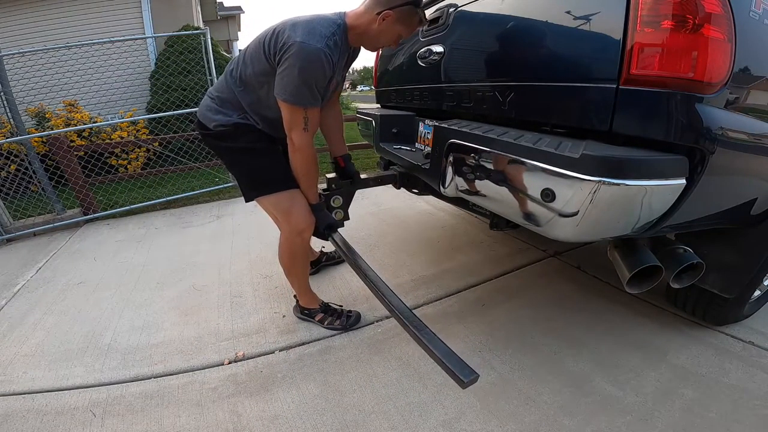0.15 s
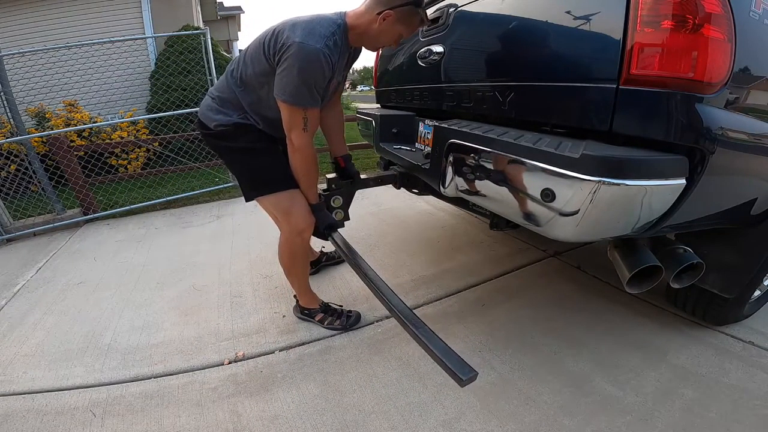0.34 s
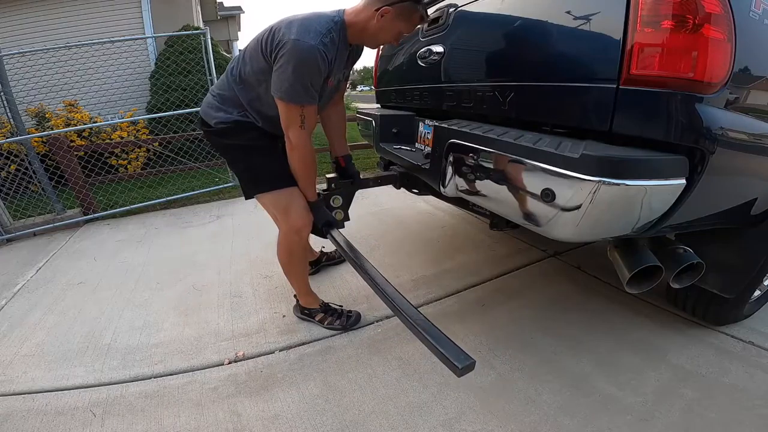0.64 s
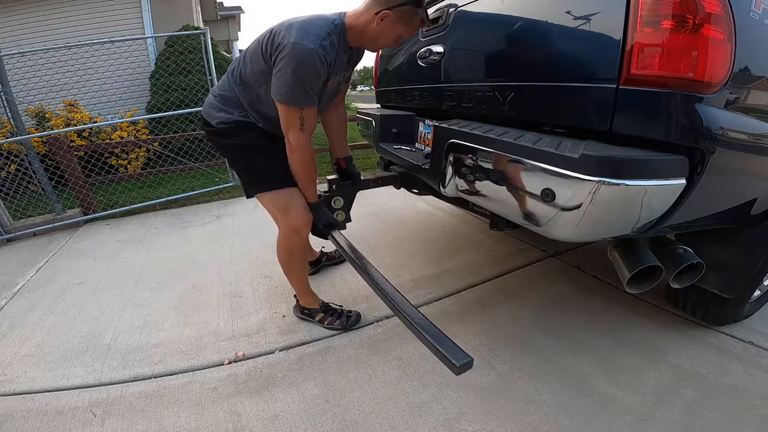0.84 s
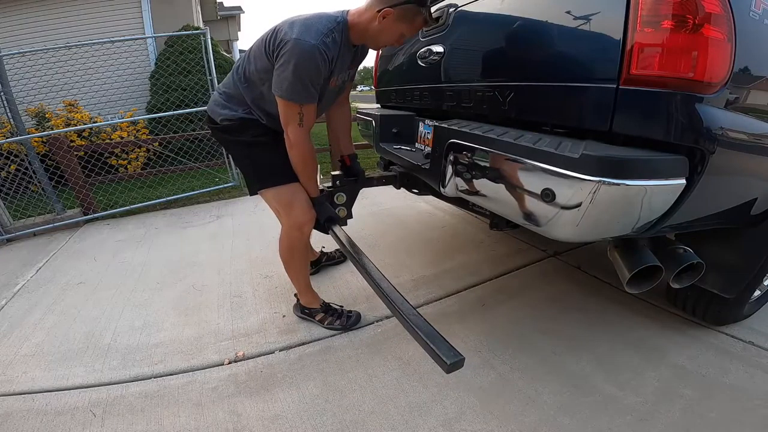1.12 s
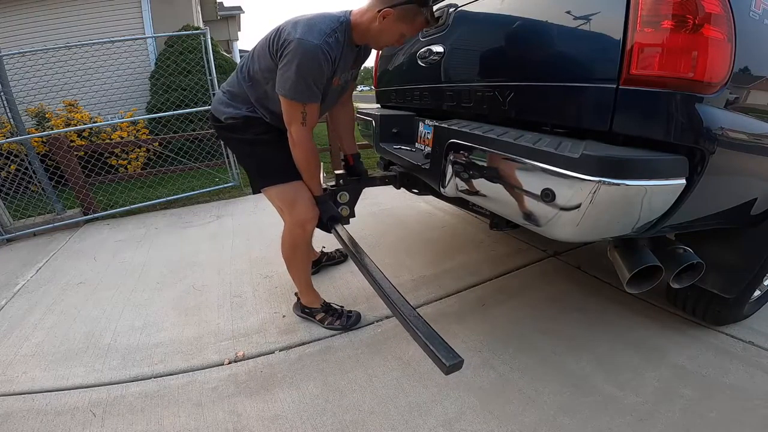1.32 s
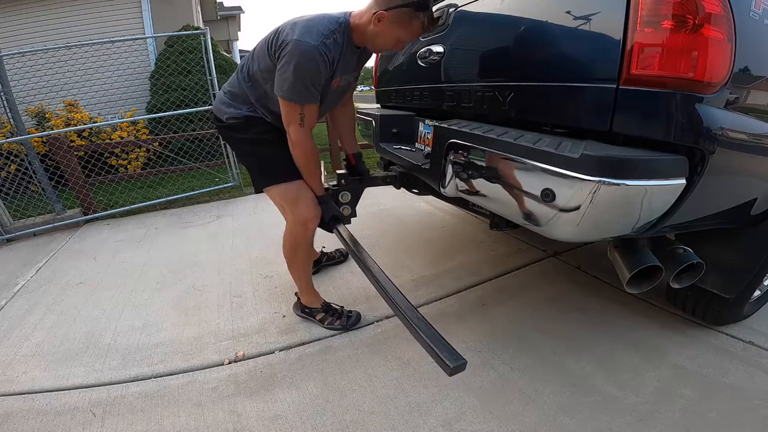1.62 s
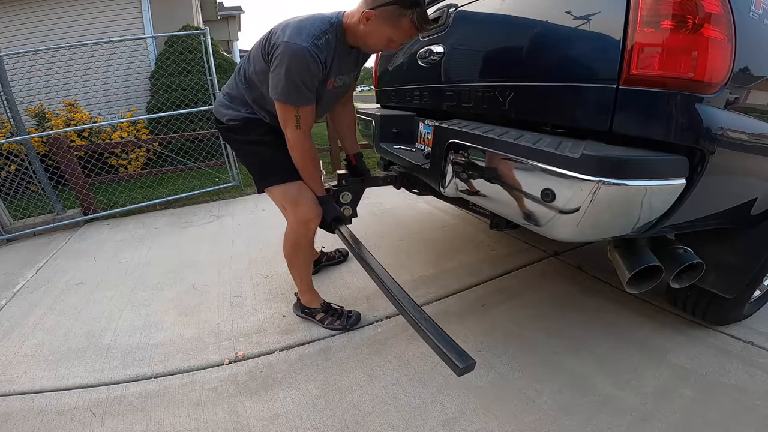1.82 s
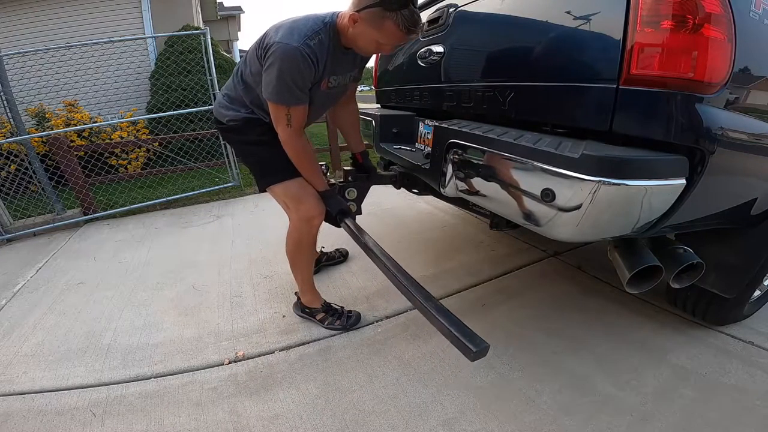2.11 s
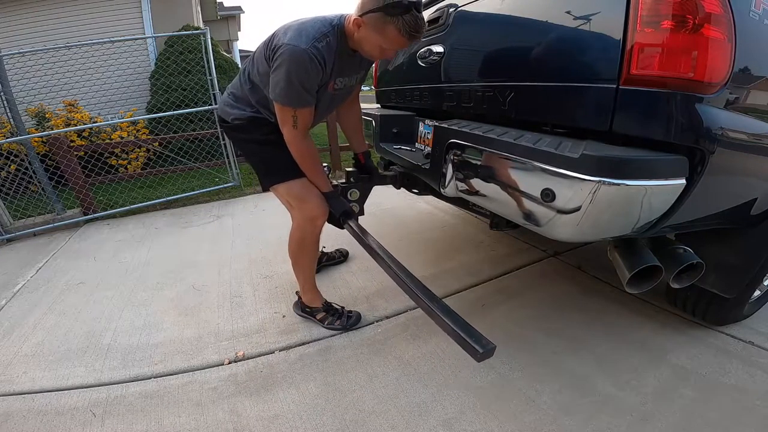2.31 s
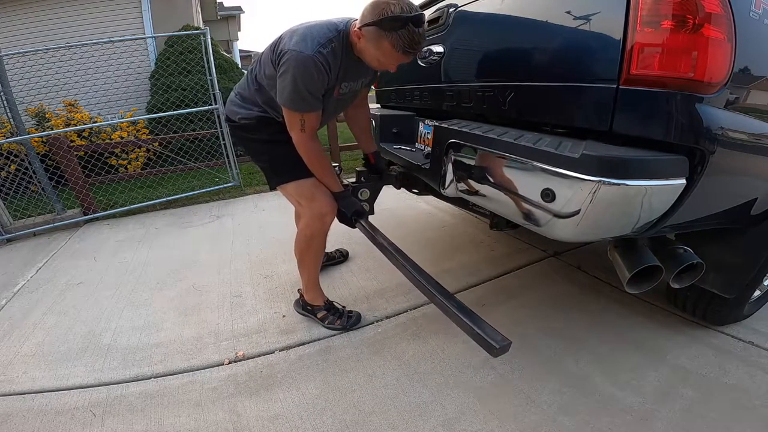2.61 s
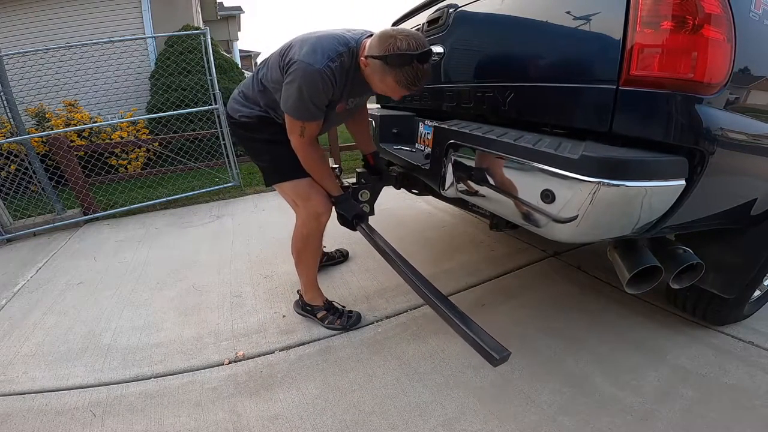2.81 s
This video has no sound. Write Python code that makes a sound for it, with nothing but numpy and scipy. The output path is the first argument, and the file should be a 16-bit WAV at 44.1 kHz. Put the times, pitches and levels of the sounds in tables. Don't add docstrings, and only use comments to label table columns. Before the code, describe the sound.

A heavy steel hitch is worked into a truck's receiver tube. A light hollow knock comes at 0.16 s, small grit ticks follow, then a loud double clank at 0.78 s rings with a low boom. From 1.1 to 2.6 s there are faint scrapes, thin squeaks and dull bumps. A loud, rapid clatter fills 2.65-2.9 s. Wind rumbles softly over faint street hiss; close outdoor stereo.

```python
import sys
import numpy as np
from scipy import signal
from scipy.fft import rfft, irfft, next_fast_len
from scipy.io import wavfile
from scipy.ndimage import uniform_filter1d

SR = 44100
rng = np.random.default_rng(int(sys.argv[2]) if len(sys.argv) > 2 else 0)


def volts_from_db(level):
    exponent = np.asarray(level, float) / 20
    return 10 ** exponent


def put_to_file(sound):
    columns = np.atleast_2d(sound).T
    safe = np.clip(columns, -1, 1)
    whole_steps = np.round(safe * 32767)
    wavfile.write(sys.argv[1], SR, whole_steps.astype(np.int16))


N = 130095
RING = 17000
MODE_SPLIT = .06
WIDEN = volts_from_db([[-1.5], [1.5]])

# pitch_hz, likeness (0..1)
LIKENESS = [(100, .996), (500, .985), (2000, .97), (5000, .78), (9000, .1)]
# pitch_hz, left_minus_right_db
STEREO_LEAN = [(200, 0), (600, -1.5), (1700, -1), (5000, -3)]


def unit(x):
    return x / np.sqrt(np.mean(x ** 2) + 1e-20)


def read(points, hz):
    f, value = np.transpose(points)
    return np.interp(np.log(hz + 1), np.log(f + 1), value)


def add(mix, s, sound):
    part = mix[..., round(s * SR):][..., :sound.shape[-1]]
    part += sound[..., :part.shape[-1]]


def air(spectrum, same, size, patch_db):
    frames, hz = 4 * N // size + 5, np.fft.rfftfreq(size, 1 / SR)
    a, b, c, d, patch = rng.standard_normal((frames, len(hz), 5)).T
    patch = uniform_filter1d(patch, size=9, axis=0)
    patch = unit(uniform_filter1d(patch, size=6, axis=1))
    like = np.clip(read(same, hz), 0, 1)[:, None]
    left = a + 1j * b
    right = like * left + np.sqrt(1 - like ** 2) * (c + 1j * d)
    gain = volts_from_db(read(spectrum, hz)[:, None] + patch_db * patch)
    noise = signal.istft(np.array([left, right]) * gain, nperseg=size)[1]
    return unit(noise[:, :N])


def outdoors():
    # time_s, buffet_db, rumble_db
    gusts = [(0, -44, -43), (.1, -49.5, -48.5), (0.269, -39.5, -47), (.65, -59, -48.5), (.95, -63, -32.5),
             (1.148, -58, -37.5), (1.52, -43, -41.5), (1.75, -39.5, -42.5), (1.9, -41.5, -56),
             (2.15, -46, -40.5), (2.36, -37, -49), (2.45, -47, -42.5), (2.68, -33, -32.5),
             (2.8, -28, -26.5), (2.95, -40.5, -50)]
    # pitch_hz, level_db
    buffet_spectrum = [(15, -33), (33, 21), (45, 15.5), (60, 25.5), (85, -5.5), (130, -54)]
    # pitch_hz, level_db
    rumble_spectrum = [(40, -42), (80, -2), (170, -0.5), (230, -12), (300, -18), (500, -26), (900, -33.5),
                       (1500, -67)]
    # pitch_hz, level_db (per Hz)
    street_spectrum = [(150, -40.5), (300, -9), (700, -12.5), (1700, -13), (5000, -17.5), (7900, -24),
                       (9000, -32.5), (14500, -72.5)]
    # pitch_hz, left_right_likeness (0..1)
    street_likeness = [(200, 0.73), (600, 0.65), (1700, 0.51), (5000, 0.1)]
    s, buffet_db, rumble_db = np.transpose(gusts)
    t = np.arange(N) / SR
    buffet = volts_from_db(np.interp(t, s, buffet_db)) * air(buffet_spectrum, LIKENESS, size=2048, patch_db=1.5)
    rumble = volts_from_db(np.interp(t, s, rumble_db)) * air(rumble_spectrum, LIKENESS, size=2048, patch_db=4.0)
    street = volts_from_db(-57) * air(street_spectrum, street_likeness, size=1024, patch_db=2.5)
    return buffet + rumble + street


def rings(hz, t60):
    # pitch_hz, rise_s
    rise_times = [(100, 0.014), (400, 0.0059), (1500, 0.00051), (8000, .002)]
    t = np.arange(RING) / SR
    rise = 1 - np.exp(-t / np.maximum(read(rise_times, hz), 1e-4)[:, None])
    fade = np.hanning(2 * RING)[RING:] ** .5
    decay = np.exp(-np.log(1000) * t / np.maximum(t60, .02)[:, None])
    return rise * fade * decay * np.sin(2 * np.pi * hz[:, None] * t)


def pair(hz, count):
    a, b = rng.standard_normal((count, len(hz), 2)).transpose(2, 0, 1)
    same = np.clip(read(LIKENESS, hz), 0, 1)
    lean = volts_from_db(read(STEREO_LEAN, hz) / 2)
    return np.array([a * lean, (same * a + np.sqrt(1 - same ** 2) * b) / lean])


def frame_modes():
    # pitch_hz, level_db (per Hz)
    clank_spectrum = [(250, -11.5), (500, -5.5), (680, -10.5), (1500, -5.5), (2600, -10), (4300, -18.5),
                      (6000, -32), (8000, -44), (14000, -104)]
    # pitch_hz, t60_s
    clank_decay = [(300, 0.42), (800, 0.39), (2000, 0.28), (4000, 0.23), (8000, 0.14), (14000, .1)]
    hz = rng.uniform(250 ** .25, 14000 ** .25, 600) ** 4
    level = volts_from_db(read(clank_spectrum, hz)) * hz ** .375
    level /= np.linalg.norm(level)
    dense = rings(hz, read(clank_decay, hz) * rng.uniform(0.7, 1.14, len(hz)))
    return hz, level, np.log2(hz / 1500), dense


def clank(strength, frame, db, tilt_db):
    hz, level, octave, dense = frame
    tilt = tilt_db * np.maximum(octave, .35 * octave)
    return (strength * level * volts_from_db(db + tilt)) @ dense


def taps(frame):
    # start_s, level_db, brightness_db_per_octave, t60_s
    tap_events = [(.154, -36, -10, 0.16), (2.652, -29, -13, 0.094), (2.356, -41.5, -21, 0.11),
                  (2.696, -19.5, -7.5, 0.14), (2.701, -14.5, -4, 0.075), (2.718, -16.5, 3.5, 0.061),
                  (2.737, -38.5, 13, 0.11), (2.78, -24.5, 2, 0.086), (2.795, -42.5, 11.5, 0.11),
                  (2.803, -18.5, -14, 0.113), (2.823, -37.5, 1, .1)]
    out, strength = np.zeros((2, N)), pair(frame[0], len(tap_events))
    t = np.arange(RING // 3) / SR
    for k, (s, db, tilt_db, t60) in enumerate(tap_events):
        tap = clank(strength[:, k], frame, db, tilt_db)[:, :RING // 3]
        add(out, s, tap * volts_from_db(-60 * t / t60))
    return out


def knocks(frame):
    # start_s, clank_db, boom_db, brightness_db_per_octave, shank_ring_db
    knock_events = [(0.16, -33, -42.5, -1.5, -82), (.165, -36.5, -30, -15, -86), (.801, -35, -21, 11, -36),
                    (.7757, -19.5, -28, -10.5, -27.5), (.779, -17.5, -24.5, 5.5, -23),
                    (1.224, -60.5, -36, 11.5, -79), (1.385, -55.5, -40, -33, -85),
                    (1.803, -53, -44.5, -15, -88), (2.196, -44.5, -38, -23.5, -78),
                    (2.271, -78, -32, 4, -75), (2.358, -39, -41.5, -17.5, -74),
                    (2.406, -48.5, -38, -10, -78), (2.524, -41.5, -29, -30.5, -80),
                    (2.653, -30, -62, -11, -69), (2.696, -23.5, -31.5, 0, -55),
                    (2.707, -16, -26.5, -14, -83), (2.718, -24.5, -17.5, 1.5, -58),
                    (2.74, -22.5, -31.5, -16.5, -57), (2.779, -43, -29, 8, -66),
                    (2.8, -33.5, -25.5, -20, -70), (2.826, -61, -34, -16, -67), (2.88, -60, -30, 8, -71)]
    # pitch_hz, level_db, t60_s
    boom_modes = [(88.1, -9, 1), (102.4, 7, 0.36), (170.5, -2.5, 0.52), (208, -2, 0.67), (242.3, -10, 0.51),
                  (285, -11.5, 0.53), (326, -11, 0.79), (421.6, -15, 0.19), (501, -19.5, 0.34)]
    # pitch_hz, level_db, t60_s
    shank_modes = [(497, -8, .15), (829, -16, .18), (1300, -13, .15), (1556, -8, .16), (1720, -8, .2),
                   (1985, -7, .18), (2487, -15, .15), (4021, -13, .1), (4320, -8, .14), (5300, -11, .1),
                   (7429, -27, .1), (9200, -37, .1), (10000, -40, .1), (11750, -48, .1)]
    count, out = len(knock_events), np.zeros((2, N))
    boom_hz, boom_mode_db, boom_t60 = np.repeat(np.transpose(boom_modes), 3, axis=1)
    shank_hz, shank_mode_db, shank_t60 = np.repeat(np.transpose(shank_modes), 3, axis=1)
    boom = rings(boom_hz * (1 + MODE_SPLIT * rng.uniform(-1.072, 1, len(boom_hz))), boom_t60)
    shank = rings(shank_hz * (1 + MODE_SPLIT / 2 * rng.uniform(-1.2, 1, len(shank_hz))), shank_t60)

    gap_db = np.array([min(row[1] - row[2], 0) for row in knock_events])[:, None]
    soft_db = .4 * gap_db * np.maximum(np.log2(boom_hz / 200), 0)
    low = (volts_from_db(boom_mode_db + soft_db) * (1.6 + pair(boom_hz, count))) @ boom
    low /= np.sqrt(np.mean(low[..., :SR // 10] ** 2, axis=(0, 2)))[:, None]

    strength, high = pair(frame[0], count), pair(shank_hz, count)
    shank_lean = volts_from_db(read(STEREO_LEAN, shank_hz) * np.array([[.5], [-.5]]))
    for k, (s, clank_db, boom_db, tilt_db, ring_db) in enumerate(knock_events):
        ring = (volts_from_db(ring_db + shank_mode_db) * (shank_lean + .5 * high[:, k])) @ shank
        add(out, s, clank(strength[:, k], frame, clank_db, tilt_db) + volts_from_db(boom_db) * low[:, k] + ring)
    return out


def tube():
    # pitch_hz, level_db, t60_s
    tube_modes = [(528, -1, .2), (870, -5, .13), (953, -12, .2), (1513, -20, .15), (1850, -15, .14),
                  (2400, -20, .13), (2660, -19, .11)]
    # start_s, level_db
    tube_hits = [
        (.161, -48.5),
        (.165, -33),
    ]
    hz, db, t60 = np.repeat(np.transpose(tube_modes), 6, axis=1)
    ring = rings(hz * (1 + MODE_SPLIT * rng.uniform(-1.18, 1, len(hz))), t60)
    out = np.zeros((2, N))
    for (s, hit_db), own in zip(tube_hits, pair(hz, len(tube_hits)).transpose(1, 0, 2)):
        add(out, s, (volts_from_db(hit_db + db) * own) @ ring)
    return out


def grit():
    # start_s, level_db, pitch_hz
    tick_events = [(.395, -43, 2010), (.467, -54, 1980), (0.648, -46.5, 3500), (.68, -43.5, 3140),
                   (0.968, -62, 6900), (1.001, -57.5, 6500), (1.041, -51, 8000), (1.129, -59, 6900),
                   (1.218, -59, 6930), (1.942, -59, 7030), (2.719, -34.5, 5850), (2.78, -40, 7000)]
    out, t = np.zeros(N), np.arange(200) / SR
    for s, db, hz in tick_events:
        wobble = 1 + 0.66 * uniform_filter1d(rng.standard_normal(200), size=3)
        tick = np.sin(2 * np.pi * hz * np.cumsum(wobble) / SR)
        add(out, s, volts_from_db(db) * tick * np.exp(-t / 0.00086))
    return out


def strokes(rows, column):
    out = np.zeros(N)
    for row in rows:
        add(out, row[0], volts_from_db(row[column]) * signal.windows.tukey(round(row[1] * SR), .7))
    return out


def resonances(x, peaks):
    out = 0
    for hz, width, db in peaks:
        b, a = signal.iirpeak(hz, hz / width, SR)
        twice = signal.lfilter(b, a, signal.lfilter(b, a, x))
        out = out + volts_from_db(db) * unit(twice)
    return out


def slides(frame):
    # start_s, length_s, grind_db, whistle_db
    slide_events = [(.635, 0.035, -74, -79), (1.11, 0.043, -58, -93), (1.208, 0.041, -48, -61),
                    (1.235, 0.076, -52, -72.5), (1.36, 0.067, -56, -103), (1.62, 0.12, -62.5, -95),
                    (2.08, .1, -48, -78.5), (2.19, 0.095, -56, -77), (2.352, 0.04, -47.5, -92),
                    (2.44, 0.064, -50.5, -74), (2.52, 0.11, -51.5, -84), (2.6, 0.055, -44.5, -85),
                    (2.65, 0.043, -33, -85), (2.72, 0.14, -35, -93), (2.92, 0.029, -53, -87)]
    # pitch_hz, width_hz, level_db
    whistle_peaks = [(5300, 26, 2), (6500, 80, -6), (7440, 44, 0.5), (7990, 67, 5), (9800, 120, -16),
                     (11900, 120, -25.5)]
    slips_per_s, slip_spread_db = 3300, 1.5
    tilt_db, damping_per_s = -8, 8.8
    slip_times = rng.random(N) < slips_per_s / SR
    slip_sizes = volts_from_db(slip_spread_db * rng.exponential(1, N)) * rng.standard_normal(N)
    slips = unit(slip_times * slip_sizes)

    hz, level, octave, dense = frame
    body = (pair(hz, 1)[:, 0] * level * volts_from_db(tilt_db * octave)) @ dense
    body = body * volts_from_db(-60 * damping_per_s * np.arange(RING) / SR)
    body /= np.linalg.norm(body[0])
    pressed = slips * strokes(slide_events, column=2)
    grind = signal.oaconvolve(pressed[None], body, axes=1)[:, :N]
    whistle = strokes(slide_events, column=3) * resonances(slips, whistle_peaks)
    return grind + whistle * WIDEN


def squeals():
    # start_s, length_s, level_db, first_hz, last_hz
    squeal_events = [(.64, 0.044, -64, 3000, 2940), (1.211, 0.068, -59, 2700, 2700),
                     (1.22, 0.036, -52.5, 783, 820), (1.243, 0.089, -58, 3250, 3140),
                     (1.249, 0.062, -54.5, 2930, 2950), (1.282, 0.08, -59.5, 1015, 985),
                     (1.276, 0.055, -70, 4430, 4180), (1.29, 0.048, -62, 2700, 2700),
                     (2.086, 0.072, -55.5, 2770, 2850), (2.09, 0.054, -60.5, 4100, 3710),
                     (2.1, 0.025, -53, 826, 780), (2.2, .07, -57.5, 2690, 2940), (2.2, .04, -53, 896, 1257),
                     (2.435, 0.024, -61, 3500, 3540), (2.439, 0.073, -61.5, 2900, 2640),
                     (2.519, 0.062, -57.5, 2900, 2570), (2.6, 0.058, -65, 2650, 2630),
                     (2.698, .014, -29, 1562, 1432), (2.797, 0.024, -39, 1437, 1420),
                     (1.246, .05, -62.5, 5250, 5350), (1.207, .03, -62, 7950, 7850),
                     (2.348, .04, -58.5, 1680, 1687), (2.357, .04, -52.5, 776, 792),
                     (2.711, .045, -61, 11200, 11100), (2.718, .04, -68, 12900, 13050),
                     (2.73, 0.059, -64, 9700, 9400), (2.752, .035, -68.5, 10900, 10600),
                     (2.776, .04, -71, 10500, 10000), (2.768, 0.027, -58, 7800, 7540),
                     (2.928, 0.027, -68, 10600, 10400), (0.7725, 0.01, -22.5, 1500, 1610),
                     (0.801, 0.014, -26.5, 1588, 1720)]
    width_hz, wander_share = 240, .006
    out = np.zeros((2, N))
    for s, length, db, first_hz, last_hz in squeal_events:
        a, b, c, wander = rng.standard_normal((4, 4000))[:, :round(length * SR)]
        glide = np.linspace(first_hz, last_hz, len(a))
        hz = glide * (1 + wander_share * unit(uniform_filter1d(wander, size=300)))
        r = np.exp(-np.pi * min(width_hz, first_hz / 7) / SR)
        noise = np.array([a + 1j * b, a + 1j * (b + c)])
        band = signal.lfilter([1], [1, -2 * r, r * r], noise)
        band = band * np.exp(2j * np.pi * np.cumsum(hz) / SR)
        add(out, s, volts_from_db(db) * unit(band.real) * signal.windows.tukey(len(a), .6))
    return out * WIDEN


def two_ports(mix):
    lag_s, most_turn = 7e-5, 1.1
    size = next_fast_len(N + 4096)
    turn = most_turn * np.tanh(2 * np.pi * np.fft.rfftfreq(size, 1 / SR) * lag_s / most_turn)
    mix = np.pad(mix, ((0, 0), (0, size - N)), "reflect")
    left = irfft(rfft(mix[0]) * np.exp(-1j * turn), size)
    return np.array([left, mix[1]])[:, :N]


def scene():
    frame = frame_modes()
    mix = outdoors() + taps(frame) + knocks(frame) + tube() + grit() + slides(frame) + squeals()
    return two_ports(mix) * signal.windows.tukey(N, 400 / N)


def roll_off(x):
    return signal.sosfilt(signal.butter(12, 14900, fs=SR, output="sos"), x)


def record(dry):
    return roll_off(dry)


dry = scene()
out = record(dry)
put_to_file(out)
```